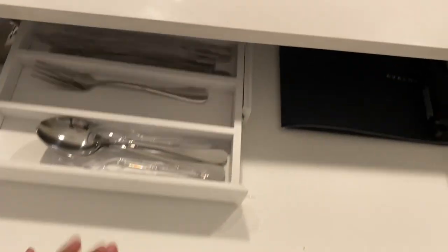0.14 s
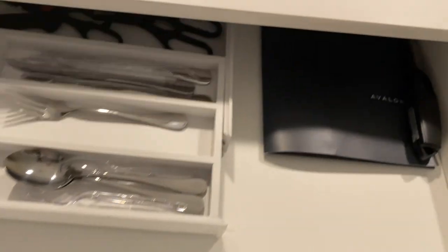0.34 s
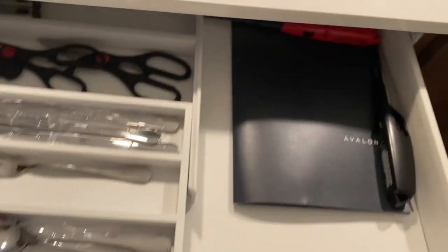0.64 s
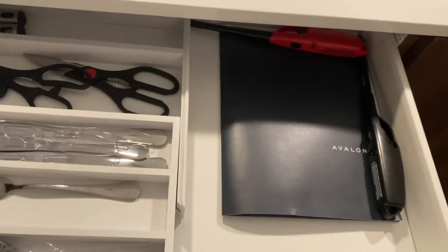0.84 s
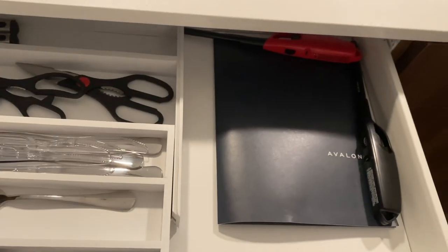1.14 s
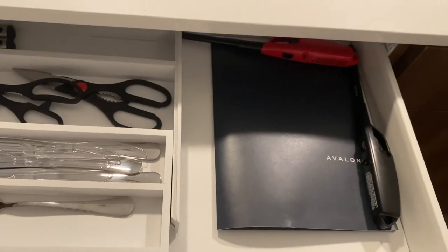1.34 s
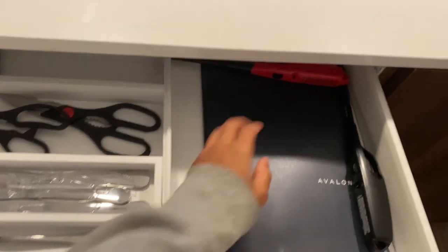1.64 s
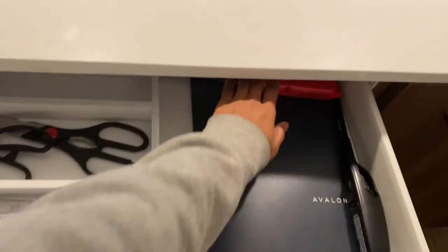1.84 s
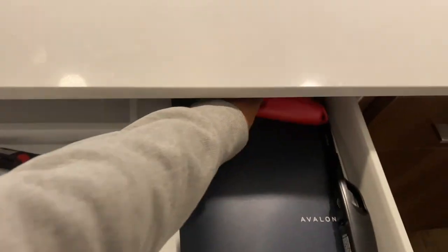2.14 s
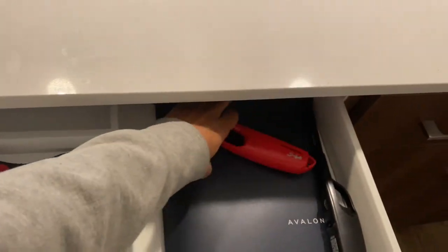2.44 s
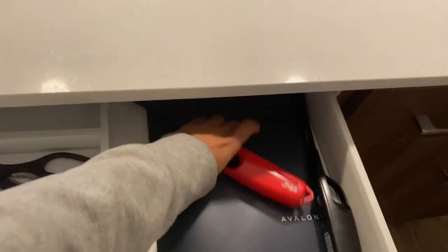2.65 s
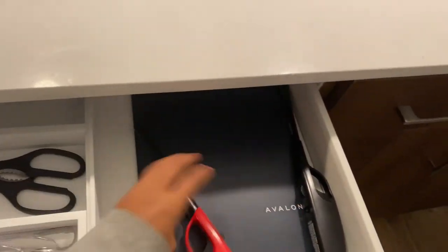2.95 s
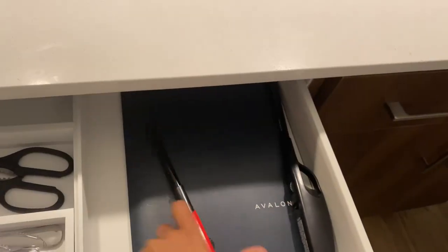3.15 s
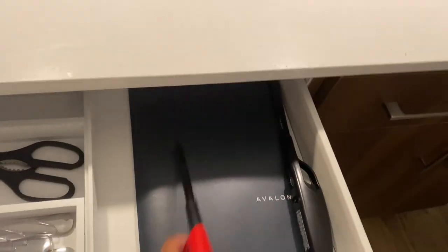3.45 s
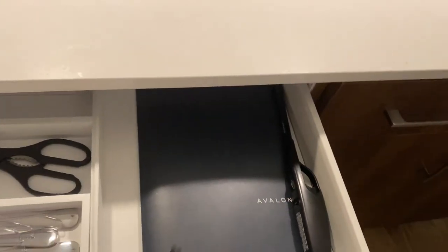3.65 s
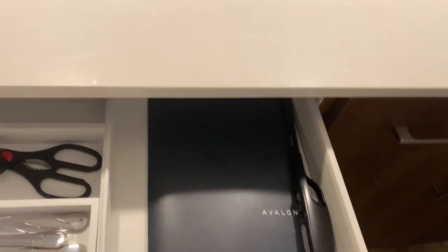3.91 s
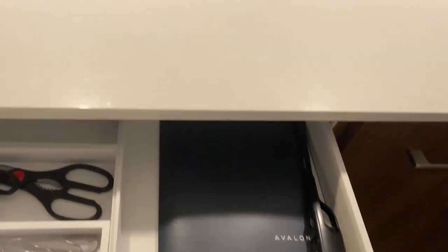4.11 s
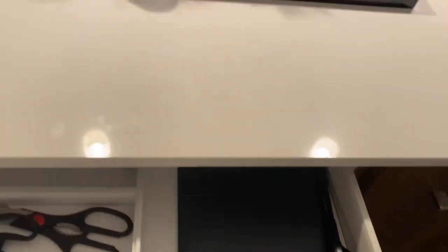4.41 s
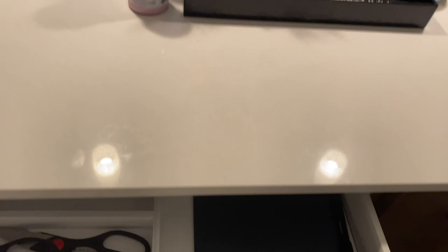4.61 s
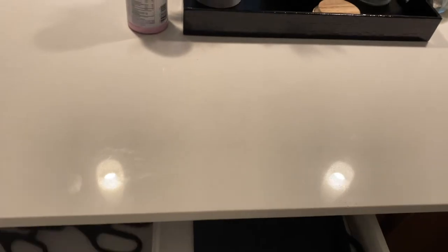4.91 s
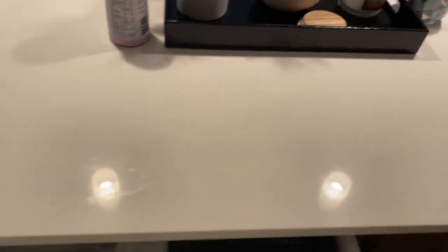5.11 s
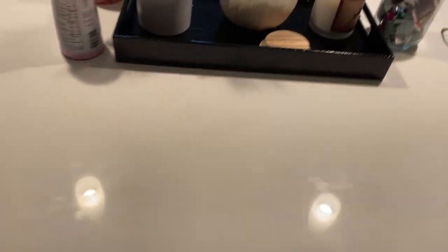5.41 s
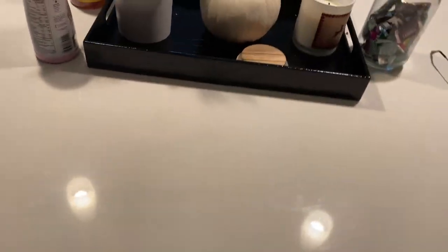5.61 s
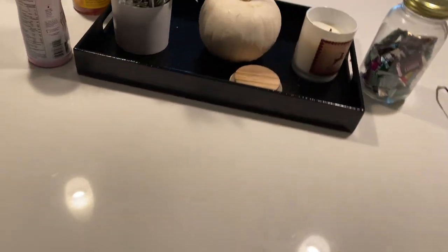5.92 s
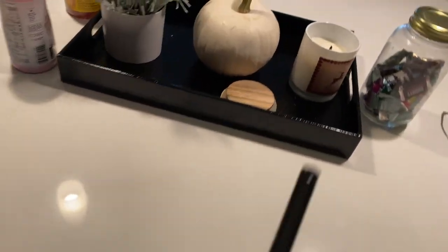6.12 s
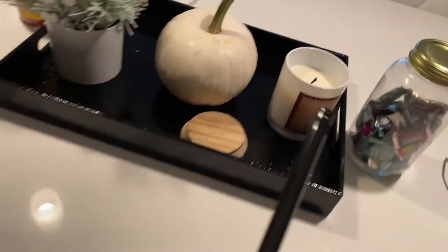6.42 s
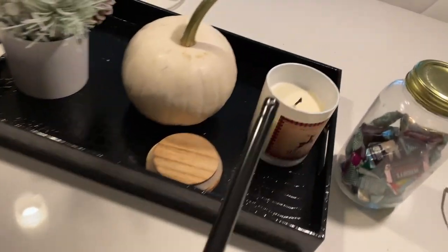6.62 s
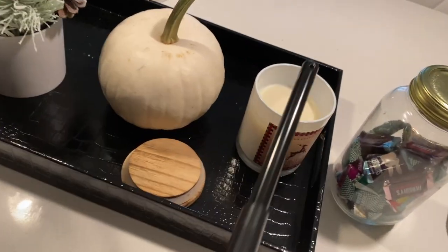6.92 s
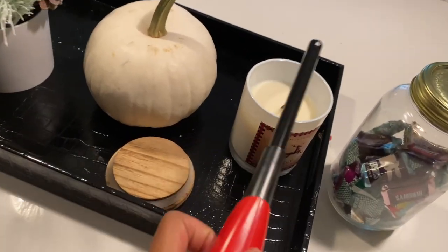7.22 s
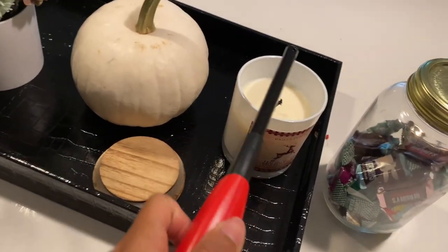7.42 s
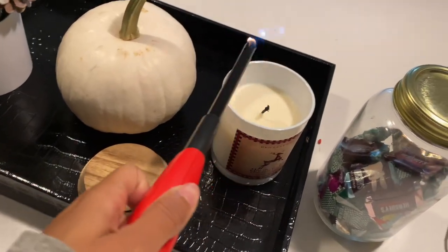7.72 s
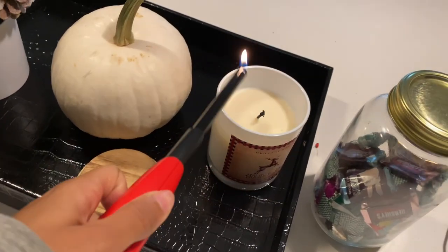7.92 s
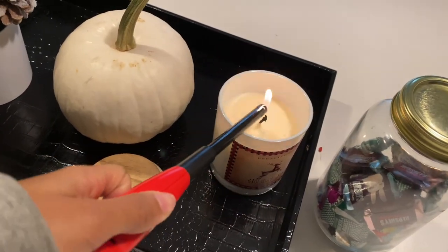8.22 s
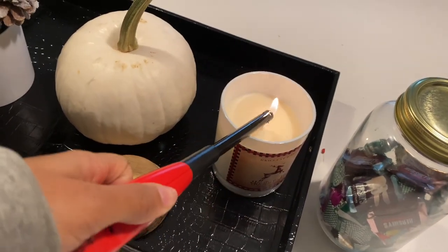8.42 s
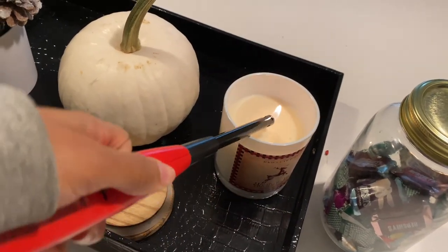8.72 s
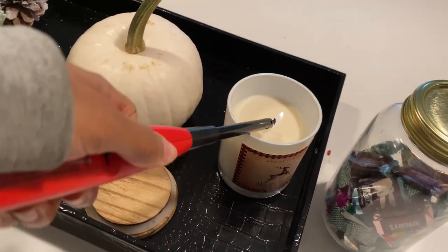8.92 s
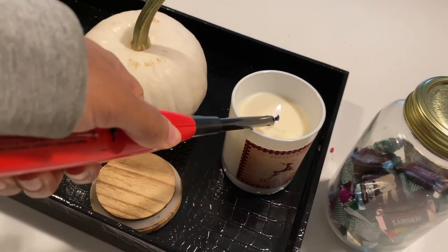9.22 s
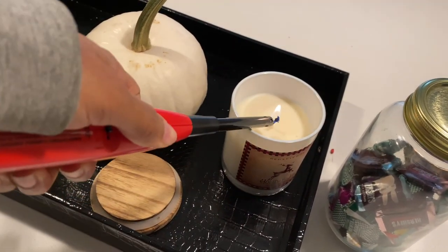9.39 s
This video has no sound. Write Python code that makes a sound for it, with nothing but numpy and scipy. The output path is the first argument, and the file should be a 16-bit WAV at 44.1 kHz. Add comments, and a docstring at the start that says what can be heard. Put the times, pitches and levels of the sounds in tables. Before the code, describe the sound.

Heard from arm's length in a quiet kitchen with hard walls, a drawer rolls open and slams, leaving forks faintly ringing. A hand drags out a plastic lighter with bursts of knocking, sliding and rustling. The drawer rumbles back in, jingling the cutlery, and its steel catch snaps home. After some soft handling clicks, the lighter fires with one sharp snap and a thin, short sizzle of gas.

```python
"""A kitchen drawer and a lighter

A drawer rumbles out on its rollers and slams into its stop, rattling the cutlery. A hand drags a
plastic utility lighter out over a folder, then the drawer rolls shut and its steel catch latches.
The lighter's trigger snaps and ticks over a candle, and gas sizzles from the nozzle.
All is heard from arm's length in a kitchen whose hard walls echo."""
import sys
import numpy as np
from scipy import signal
from scipy.fft import rfft, irfft
from scipy.io import wavfile
from scipy.ndimage import uniform_filter1d

SR = 44100
rng = np.random.default_rng(int(sys.argv[2]) if len(sys.argv) > 2 else 0)


def output_pcm(signal):
    """Save a mono or channel-first signal as 16-bit PCM at the path in sys.argv[1].

    Samples are clipped to [-1, 1] before scaling.
    """
    pcm = np.clip(np.atleast_2d(signal).T, -1, 1) * 32767
    wavfile.write(sys.argv[1], SR, np.round(pcm).astype(np.int16))


N = 421155
TIME = np.arange(N) / SR

# A "colour" says how strong each pitch is. A "ring time" is how long a sound takes to fall by 60 dB.
# Colour of the room's air. Each row: frequency in Hz, level in dB.
AIR_COLOUR = [(15, -50), (25, -12.5), (101, -5.5), (160, -9.5), (523, -27), (3930, -44), (5430, -39),
              (9810, -39), (12200, -41.5), (14300, -38), (15500, -45.5)]
# The kitchen's echo. Each row: frequency in Hz, ring time in seconds.
ECHO_TIMES = [(80, 0.39), (300, 0.5), (1000, 0.58), (2500, 0.61), (6000, 0.54), (14000, 0.27)]
# Resonances of the two microphone openings (ports). Each row: frequency in Hz, gain in dB.
PORT_COLOUR = [(6000, 2), (7400, 2), (8450, -7.5), (9400, 5.5), (11100, 3), (12200, -27.5), (13200, 4),
               (14900, 1)]
# The right port is duller in the middle, brighter on top. Each row: frequency in Hz, dB above the left.
RIGHT_OVER_LEFT = [(80, -0.5), (250, -1.3), (520, -3), (1200, -1.1), (4000, -4), (9000, 1), (14000, 2)]

# Lighter and hand sliding over folder and drawer.
# Each row: time of the peak in seconds, level in dB, swell in seconds, fade in seconds.
STROKES = [(2.075, -39, 0.016, 0.025), (2.29, -43, 0.032, 0.036), (2.555, -32, 0.03, 0.0078),
           (2.665, -34.5, 0.04, 0.03), (2.735, -34, 0.14, 0.084), (2.86, -45, 0.048, 0.018),
           (3.188, -29, 0.033, 0.0083), (3.335, -44.5, 0.042, 0.01), (3.44, -56.5, 0.062, 0.054),
           (3.72, -57.5, 0.3, 0.26), (4.19, -43.5, 0.068, 0.036), (4.39, -48, 0.074, 0.036),
           (6.55, -60, 0.088, 0.096)]
# Sleeve and grip rustling. Each row: time of the peak in seconds, level in dB, length in seconds.
RUSTLES = [(1.612, -46, 0.18), (1.782, -48.5, 0.099), (2.113, -40.5, 0.25), (3.185, -31, 0.05),
           (3.573, -55.5, 0.43), (4.139, -40, 0.025), (4.21, -44, 0.16), (6.218, -54.5, 0.24),
           (6.874, -42.5, 0.11), (7.138, -52.5, .1), (7.431, -49.5, 0.043), (7.585, -52, 0.083)]
# Colours of the sliding and the rustling. Each row: frequency in Hz, level in dB.
STROKE_COLOUR = [(100, -12.5), (500, -9.5), (1500, -0.5), (3500, -3.5), (5500, -6.5), (8000, -4),
                 (11000, -6.5), (14500, -6.5)]
RUSTLE_COLOUR = [(50, -6), (150, 3), (300, -1), (700, -7), (1700, -14.5), (3500, -30), (9000, -34.5),
                 (15000, -45)]

# The tones (modes) a struck thing rings with. Each row: frequency in Hz, level in dB, ring time in seconds.
FLOOR_MODES = [(75.2, -18.5, 0.89), (178.5, -14.5, .18), (228.7, -14.5, 0.27), (462, -10.5, 0.15),
               (544, -7, 0.1), (609, 2.5, 0.092), (953, 0.5, 0.05), (1487, -5, 0.036)]  # drawer floor under the folder
SPOON_MODES = [(2700, -4, .06), (4400, -7, .04), (6750, 0, .06)]  # one loose spoon
FORK_MODES = [(1039, -44, 2.0), (1308, -39, .7), (2094, -42, 1.0), (2293, -35, 1.55), (2385, -44, 1.6)]  # forks and spoons that keep ringing
SHELL_MODES = [(1345, -9.5, 0.022), (1560, -0.5, 0.037), (1907, 0.5, 0.0316), (2350, 1, 0.055),
               (2600, -2, .03), (3335, -6, 0.027), (3630, -2, 0.025), (3910, -3.5, 0.04), (4124, -7, 0.047),
               (6800, -11, 0.0459), (11530, -11.5, 0.025), (14830, -6, 0.0249)]  # the lighter's plastic shell
CATCH_MODES = [(1548, -8, 0.15), (1598, -6, 0.11), (1896, 1.5, 0.11), (2040, -12, .12), (2090, -0.5, 0.12),
               (2256, -6.5, 0.12), (2326, -4.5, 0.12), (2465, -7, 0.13), (2820, -14.5, 0.084),
               (3582, -14.5, 0.13), (6540, -3, 0.071)]  # steel catch of the runners
PANEL_MODES = [(68, -11, 0.76), (128.6, 6, 0.17), (185.8, -10.5, 0.24), (239, -1, 0.24),
               (311.5, -2.5, 0.28), (390, -8, .18), (463, -8, 0.11), (566, 2, 0.089), (764, -3.5, 0.13)]  # the drawer's panels

# Hard hits. Each row: start in seconds, level in dB, pitch of the knock in Hz, chatter in milliseconds,
# then the crack and the ring, both in dB compared with the knock.
FOLDER_HITS = [(1.994, -33, 1200, 6.9, -1, -7), (2.0445, -9, 1200, 4.6, -13, -13),
               (2.058, -8.5, 1090, 3.8, -4.5, -11.5), (2.0945, -12.5, 1210, 1.4, -0.5, -8),
               (2.1195, -7.5, 1140, 3.1, -8, -1), (2.2534, -12.5, 1260, 0.82, -4, -14),
               (2.2838, -9.5, 1520, 3.7, -12.5, -11), (2.3315, 1.5, 900, 4.18, -14.5, -8),
               (2.452, -21, 1270, 1.2, -6, -18), (2.493, -10.5, 1070, 2.9, -8.5, -11.5),
               (2.641, -18.5, 1470, 1.2, -19, -42), (2.8206, -19, 1140, 2.5, -9, -19),
               (3.082, -19.5, 1080, 0.72, -8, -12), (3.102, -24, 1200, 1.2, -22, -19),
               (3.1364, -14.5, 1800, 5.8, -15, -7), (3.2778, -20, 1490, 3.5, -10, -18)]  # lighter on the folder
LIGHTER_HITS = [(3.8925, -23, 3560, 1.5, 4, -16), (6.1435, -32.5, 3040, 1.8, -3.5, -19),
                (6.176, -32, 4000, 1.77, -15, -12), (6.327, -44.5, 3060, 2.2, -9, -20),
                (6.469, -42.5, 1200, 3.4, 2, -26.5), (6.84, -37.5, 1580, 6.4, -9, -10),
                (7.1932, -26, 1290, 1.8, -7, -17), (7.201, -27.5, 798, 2.7, -11, -18.5),
                (7.6203, -10, 2600, 1.9, 16.5, -12.5), (8.002, -17, 2500, 2.0, -5, 2.5),
                (8.3225, -28.5, 2017, 2.4, -28, -6)]  # lighter clicking in the hand
LATCH_HITS = [(4.576, -27, 1500, 5, -9, -27), (4.6325, -28, 5000, 1.4, 8, -20),
              (4.687, -18.5, 5300, 6.1, -2.5, -10), (4.935, -27.5, 4030, 3.8, 6.5, -19),
              (5.6507, -19.5, 3050, 4, -3, -14.5), (5.677, -18, 1700, 26, -0.5, -15),
              (5.7075, -2.5, 1980, 5.34, 1.5, -4), (5.7245, 3.5, 2080, 4, -2.5, -18.5)]  # latch engaging and snapping home
DRAWER_HITS = [(.004, -13, 407, 16.4, -8, -10), (.032, -14, 302, 5.1, -11, -2.5),
               (.629, -13, 710, 9.6, -3.5, -14), (.637, -5, 613, 3.2, -4, -4), (.645, 4, 265, 5.2, -4, -7),
               (.654, 6.5, 720, 15, -4.5, -20.5), (.893, -15.5, 604, 20, -25.5, -25),
               (.951, -10.5, 630, 13.6, -33, -22), (4.106, -32.5, 690, 14.4, -13.5, -20),
               (4.386, -24.5, 1530, 13.5, -29, -0.5), (4.706, -16, 670, 2.6, -22, -7),
               (5.272, -15, 238, 5.3, -25, -6), (5.945, -24.5, 900, 7.3, -31, -18),
               (6.098, -30.5, 840, 9.2, -32.5, -13)]  # blows on the drawer

# Taps of the loose spoon. Each row: start in seconds, level in dB.
SPOON_TAPS = [(0.122, -27), (0.1785, -37.5), (0.201, -26.5), (.236, -35), (.281, -38.5), (0.292, -37.5),
              (0.368, -34), (0.422, -40), (.438, -34.5), (0.509, -39.5), (0.53, -41.5), (4.764, -29.5),
              (4.814, -29.5), (4.899, -35), (4.976, -28), (5.1238, -26.5), (5.557, -28.5)]
# Jolts to the cutlery. Each row: start in seconds, level in dB, swell in seconds, settling in seconds.
JOLTS = [(.030, -20.5, 0.013, 0.026), (.122, -33.5, 0.008, 0.0092), (0.651, -6.5, 0.042, 0.023),
         (0.781, -31, .011, 0.1), (4.805, -35, 0.011, 0.015), (5.12, -29.5, 0.052, 0.079),
         (5.195, -21, 0.015, .04), (5.289, -25.5, 0.016, 0.034), (5.37, -33.5, 0.012, 0.069),
         (5.551, -32, 0.012, 0.044)]
# Colour of cutlery in its tray. Each row: frequency in Hz, level in dB.
RATTLE_COLOUR = [(300, -16), (700, -3), (1200, 0), (2100, 2), (3200, -3), (5000, -2), (8000, -6.5),
                 (11000, -4), (14500, -3)]

# Spurts of gas. Each row: time of the peak in seconds, level in dB, swell in seconds, fade in seconds.
GAS_SPURTS = [(7.66, -37.5, 0.019, 0.055), (7.87, -55.5, .06, .05), (8.19, -59.5, 0.0077, 0.031)]
# Colour of the gas. Each row: frequency in Hz, level in dB.
GAS_COLOUR = [(1000, -25), (4000, -15), (9500, 3.5), (14500, -8.5)]
# Tones of the spring behind the lighter's hammer. Each entry: frequency in Hz.
SPRING_HZ = [2650, 6520, 9320, 14900]

# Colour of the rollers on their rails. Each row: frequency in Hz, level in dB.
ROLL_COLOUR = [(21, -41.5), (35, -17.5), (80, 0), (112, 1), (158, -4), (240, -1), (318, -6.5), (357, -1),
               (440, -12), (733, -9), (843, -14.5), (1540, -25), (2500, -28), (4000, -43.5), (9000, -53),
               (19800, -120)]
# Loudness of the rolling, out and back in. Each row: time in seconds, level in dB.
ROLL_OUT = [(0, -23), (.16, -30.5), (.27, -29), (.62, -34)]
ROLL_IN = [(4.64, -48.5), (4.78, -29.5), (5.05, -31.5), (5.28, -21), (5.38, -34.5), (5.8, -33.5),
           (6.2, -58.5)]
# Roller bumps on the way in. Each row: start in seconds, level in dB, pitch in Hz.
ROLLER_BUMPS = [(4.773, -23, 400), (4.856, -21, 350), (4.931, -22, 450), (4.99, -21, 420),
                (5.059, -23, 350), (5.084, -26, 400), (5.207, -14.5, 600), (5.3, -17, 500),
                (5.476, -21, 300), (5.556, -42.5, 350), (5.599, -27.5, 250)]
# Hollow knocks as the push begins.
# Each row: start in seconds, level in dB, pitch it sinks towards in Hz, swell in milliseconds.
PUSH_CLUNKS = [(4.58, -21.5, 436, 8.2), (4.638, -20, 387, 5.6)]
# Soft, low booms. Each row: start in seconds, level in dB, pitch in Hz, fade of the push in milliseconds.
THUDS = [(0.649, -11, 135.9, 12), (1.98, -39, 125, 11), (2.118, -44.5, 69.5, 76), (2.269, -28, 68, 145),
         (2.821, -23, 328, 4), (3.083, -26.5, 320, 5.9), (3.139, -22.5, 168.7, 12.7),
         (3.419, -40, 78.2, 57), (4.312, -33, 64, 57), (4.392, -32.5, 64.02, 290), (5.70, -20.5, 110.3, 70),
         (7.55, -34, 90, 14), (7.622, -26.5, 151.1, 36), (7.656, -23, 85.5, 8.9), (8.011, -39.5, 191, 13.6)]

SLAM_S = .66  # the drawer has just hit its stop


def amp(db):
    """Turn decibels into a number to multiply by."""
    return 10 ** (np.asarray(db) / 20)


def unit_rms(x):
    """Scale a sound so its average strength (rms) is 1."""
    return x / np.sqrt(np.mean(x ** 2))


def unit_peak(x):
    """Scale a sound so its peak is 1."""
    return x / np.abs(x).max()


def add(track, s, sound):
    """Mix a sound into a track, starting at s seconds."""
    start = max(int(s * SR), 0)
    track[:, start:start + sound.shape[-1]] += sound[..., :N - start]


def lookup(points, hz):
    """Read between the rows of a (Hz, value) table, spacing octaves evenly."""
    f, value = np.transpose(points)
    return np.interp(np.log(hz + 1), np.log(f), value)


def keep_band(x, hz, kind, order=1):
    """Let the "low" part, the "high" part or a "band" of a sound through."""
    return signal.lfilter(*signal.butter(order, hz, kind, fs=SR), x)


def resonate(x, hz, sharpness):
    """Bring out one pitch in a sound."""
    return signal.lfilter(*signal.iirpeak(hz, sharpness, fs=SR), x)


def colour(x, points, size=4096):
    """Filter a sound with a colour table."""
    gains = amp(lookup(points, np.arange(size // 2 + 1) * SR / size))
    cepstrum = irfft(np.log(gains))
    # Folding this in half keeps the filter from sounding before its input.
    cepstrum[1:size // 2] *= 2
    cepstrum[size // 2 + 1:] = 0
    response = irfft(np.exp(rfft(cepstrum)))
    return signal.oaconvolve(x, response[None])[:, :x.shape[1]]


def envelope(curve):
    """Smooth loudness through (seconds, dB) rows, silent outside them."""
    s, db = np.transpose(curve)
    active = (TIME >= s[0]) & (TIME <= s[-1])
    return uniform_filter1d(amp(np.interp(TIME, s, db)) * active, size=600)


def swells(rows):
    """Loudness of movements that each grow to a peak and die away."""
    power = sum(amp(2 * db) * np.exp(-2 * np.maximum((s - TIME) / swell, (TIME - s) / fade))
                for s, db, swell, fade in rows)
    return np.sqrt(power)


def damped_swell(t, swell_ms):
    """Loudness of a vibration that builds briefly and is then choked."""
    age = t * 1000 / swell_ms
    return age * np.exp((1 - age ** 3) / 3)


def wander(rate):
    """A random curve that heads for a new value rate times a second."""
    knots = rng.standard_normal(2000)
    return np.interp(TIME * rate, np.arange(len(knots)), knots)


def wavering(hz, rate):
    """A tone whose strength and phase wander."""
    phase = 2 * np.pi * np.cumsum(hz) / SR
    return unit_rms(wander(rate) * np.sin(phase) + wander(rate) * np.cos(phase))


def stereo_noise(n, apart_hz):
    """Left and right noise: alike in the bass, unrelated above apart_hz."""
    mid, side = rng.standard_normal((2, n))
    side = keep_band(side, apart_hz, "high")
    return unit_rms(np.array([mid + side, mid - side]))


def grains(rate, spread_db):
    """Tiny random contacts, about rate a second, a few stronger than the rest."""
    happens = rng.random(N) < rate / SR
    size = np.minimum(rng.exponential(size=N), 4)
    return happens * amp(spread_db * size)


def crackle(rate, spread_db, length_s):
    """Each tiny contact gives a short burst of noise."""
    decay = np.exp(-1 / (length_s * SR))
    power = signal.lfilter([1], [1, -decay], grains(rate, spread_db) ** 2)
    return unit_rms(np.sqrt(power) * stereo_noise(N, 1300))


def ring(modes, seconds, vary_db=1.5):
    """Fading tones of a struck thing, mixed by chance as if each blow lands somewhere new."""
    t = np.arange(int(seconds * SR)) / SR
    out = np.zeros(len(t))
    for hz, db, ring_s in modes:
        share, side = rng.standard_normal(2)
        gain = np.sign(side) * amp(db + vary_db * share)
        out += gain * np.sin(2 * np.pi * hz * t) * np.exp(-np.log(1000) * t / ring_s)
    return out


def hits(table, modes, sharpness, crack_hz, rise_ms=1):
    """Each hit chatters briefly: a dull knock, a bright crack, then the ring of the struck thing."""
    out, t = np.zeros((2, N)), TIME[:SR // 8]
    for s, db, hz, chatter_ms, crack_db, ring_db in table:
        force = (1 - np.exp(-t * 1000 / rise_ms)) * np.exp(-t * 1000 / chatter_ms)
        knock = resonate(stereo_noise(len(t), 1300) * force, hz, sharpness)
        knock = keep_band(knock, 2 * hz, "low")
        crack = keep_band(stereo_noise(len(t), 5600) * force, crack_hz, "high")
        add(out, s, amp(db) * (unit_peak(knock) + amp(crack_db) * unit_peak(crack)))
        add(out, s + chatter_ms / 2000, amp(db + ring_db) * unit_peak(ring(modes, .5)))
    return out


def room_air(level_db=-60.5):
    """The room's air is a quiet, steady rumble with a faint hiss."""
    return amp(level_db) * unit_rms(colour(stereo_noise(N, 500), AIR_COLOUR))


def kitchen_echo():
    """Sound bounces off the worktop and walls; the highest pitches die first."""
    t, hz = TIME[:SR], np.arange(SR // 2 + 1)
    spectrum = rfft(stereo_noise(SR, 600))
    echo = 0
    for centre_hz, ring_s in ECHO_TIMES:
        band = lookup([(f, f == centre_hz) for f, _ in ECHO_TIMES], hz)
        echo = echo + irfft(spectrum * band) * np.exp(-np.log(1000) * t / ring_s)
    arrival = np.clip(t / 0.004 - 1, 0, 1)
    early_boost = 1 + 0.56 * np.exp(-t / 0.019)
    return unit_rms(echo * arrival * early_boost) / np.sqrt(SR)


def handling(drag_db=-3, grip_db=-1, rasp_hz=4200, rasp_db=-8, swell_share=.45):
    """Plastic, skin and sleeve catch and slip in tiny steps; the folder rasps under each stroke."""
    slips = crackle(2600, 3.0, .0004) * amp(1.5 * wander(45))
    rasp = unit_rms(resonate(slips, rasp_hz, 2.5))
    drag = (unit_rms(colour(slips, STROKE_COLOUR)) + amp(rasp_db) * rasp) * swells(STROKES)
    rustles = swells([(s, db, swell_share * length, (1 - swell_share) * length)
                      for s, db, length in RUSTLES])
    grip = unit_rms(colour(crackle(2000, 3.6, 0.0026), RUSTLE_COLOUR)) * rustles
    return amp(drag_db) * drag + amp(grip_db) * grip


def folder_knocks():
    """The lighter knocks on the folder, and the drawer floor rings beneath it."""
    return hits(FOLDER_HITS, FLOOR_MODES, sharpness=1.1, crack_hz=1200)


def singing_forks():
    """A few loose pieces of cutlery ring on long after the slam."""
    out = np.zeros((2, N))
    add(out, SLAM_S, ring(FORK_MODES, 2, vary_db=0.5))
    return out


def spoon_clinks(contact_hz=2500, chatter_ms=4.5, crack_db=0, ring_db=-10):
    """A loose spoon hops in the tray with light, bright taps."""
    taps = [(s, db, contact_hz, chatter_ms, crack_db, ring_db) for s, db in SPOON_TAPS]
    return hits(taps, SPOON_MODES, sharpness=1.2, crack_hz=4000)


def cutlery_rattle(tines_db=-8, ring_s=0.015, tone_count=90):
    """Jolts shake knives and forks in their plastic tray; each contact rings the steel briefly."""
    shake, t = np.zeros((1, N)), TIME[:SR]
    for s, db, swell, settle in JOLTS:
        rise = np.sqrt(np.minimum(t / swell, 1))
        fall = np.exp(-np.maximum(t - 1.4 * swell, 0) / settle)
        add(shake, s, amp(db) * rise * fall)
    contacts = unit_rms(colour(crackle(1100, 1.2, 0.0031), RATTLE_COLOUR))
    steel = ring([(hz, 0, ring_s) for hz in rng.uniform(2000, 15000, tone_count)], .3)
    tines = unit_rms(signal.oaconvolve(contacts, steel[None])[:, :N])
    return (contacts + amp(tines_db) * tines) * shake


def gas():
    """Gas sizzles thinly from the nozzle after the snap, and again as the flame meets the wick."""
    return unit_rms(colour(crackle(4000, 1.5, .0005), GAS_COLOUR)) * swells(GAS_SPURTS)


def lighter_clicks():
    """The lighter clicks in the hand, and its plastic shell rings briefly."""
    return hits(LIGHTER_HITS, SHELL_MODES, sharpness=1.8, crack_hz=2440)


def trigger_snap(start_s=7.6208, level_db=-0.5, body_hz=1290, rasp_db=-9, spring_db=-12):
    """The lighter's spring hammer fires: the body rasps, the spring zings, the hand damps them."""
    out, t = np.zeros((2, N)), TIME[:SR // 20]
    rasp = unit_rms(keep_band(stereo_noise(len(t), 2280), [1000, 4500], "band"))
    body = damped_swell(t, swell_ms=2.2) * (np.sin(2 * np.pi * body_hz * t) + amp(rasp_db) * rasp)
    spring = damped_swell(t, swell_ms=0.97) * sum(np.sin(2 * np.pi * hz * t) for hz in SPRING_HZ)
    add(out, start_s, amp(level_db) * (body + amp(spring_db) * spring))
    return out


def whirr_pitch(pull_hz=376, rise_hz_per_s=165, push_hz=441.5, brake_hz_per_s=300, creep_hz=227.5):
    """The rollers' pitch follows their speed: up with the pull, down as a damper brakes the drawer."""
    pulled = pull_hz + rise_hz_per_s * TIME
    coasting_s = np.maximum(TIME - 4.7, 0)
    pushed = np.maximum(push_hz - brake_hz_per_s * coasting_s, creep_hz)
    return np.where(TIME < SLAM_S, pulled, pushed)


def rollers(panel_db=-5, whirr_db=-7, overtone_db=-16, uneven_db=1.5, gain_db=-2.0):
    """Rollers rumble and whirr along the rails, shaking the drawer's panels."""
    rails = unit_rms(colour(crackle(380, 2.3, 0.0013), ROLL_COLOUR))
    kicks = grains(300, 2.7) * rng.standard_normal(N)
    panels = unit_rms(signal.oaconvolve(kicks, ring(PANEL_MODES, .5))[:N])
    hz = whirr_pitch()
    whirr = amp(whirr_db) * wavering(hz, 35) + amp(overtone_db) * wavering(2 * hz, 60)
    rolling = rails + amp(panel_db) * panels + whirr
    return rolling * amp(gain_db + uneven_db * wander(22)) * (envelope(ROLL_OUT) + envelope(ROLL_IN))


def roller_bumps(chatter_ms=6, crack_db=-24, ring_db=-7):
    """A roller jumps a rough spot on its rail and taps the drawer."""
    bumps = [(s, db, hz, chatter_ms, crack_db, ring_db) for s, db, hz in ROLLER_BUMPS]
    return hits(bumps, PANEL_MODES, sharpness=1.6, crack_hz=900)


def push_clunks(rough=0.51, upper_db=2, sag=0.14):
    """The soft-close mechanism in the runners knocks when pushed; the pitch sags as the contact slackens."""
    out, t = np.zeros((2, N)), TIME[:SR // 20]
    for s, db, hz, swell_ms in PUSH_CLUNKS:
        pitch = hz * (1 + sag * np.exp(-t * 1000 / swell_ms))
        phase = 2 * np.pi * np.cumsum(pitch) / SR
        hollow = np.sin(phase) + amp(upper_db) * np.sin(1.8 * phase)
        grit = unit_rms(keep_band(stereo_noise(len(t), 1200), [hz / 2, 3 * hz], "band", order=2))
        add(out, s, amp(db) * damped_swell(t, swell_ms) * (hollow + rough * grit))
    return out


def thuds():
    """Each soft push makes a low boom that swells and dies away."""
    out, t = np.zeros((2, N)), TIME[:SR]
    for s, db, hz, push_ms in THUDS:
        push = stereo_noise(SR, 600) * np.exp(-t * 1000 / push_ms)
        boom = keep_band(push, [0.46 * hz, 2.1 * hz], "band", order=2)
        add(out, s, amp(db) * unit_peak(boom))
    return out


def latch_snaps():
    """The latch engages and snaps home, ringing its steel catch."""
    return hits(LATCH_HITS, CATCH_MODES, sharpness=7.3, crack_hz=2500)


def drawer_knocks():
    """Blows ring the drawer's panels, hardest when it slams into its stop."""
    return hits(DRAWER_HITS, PANEL_MODES, sharpness=0.88, crack_hz=900)


def place(x, echo, echo_db, left_db, lag_samples=1):
    """A sound on the left reaches the left port louder and sooner; the room adds its echo."""
    left = x[0] * amp(left_db / 2)
    right = np.pad(x[1], (lag_samples, 0))[:N] * amp(-left_db / 2)
    return np.array([left, right]) + amp(echo_db) * signal.oaconvolve(x, echo, axes=1)[:, :N]


def scene():
    """Mix drawer, cutlery, hand and lighter in the kitchen, over quiet room air."""
    echo = kitchen_echo()
    drawer = rollers() + roller_bumps() + drawer_knocks() + thuds()
    rummage = folder_knocks() + handling() + push_clunks()
    latch = latch_snaps()
    lighter = lighter_clicks() + trigger_snap() + gas()
    cutlery = cutlery_rattle() + spoon_clinks() + singing_forks()
    return (room_air()
            + place(rummage, echo, echo_db=-7.5, left_db=1.0)
            + place(cutlery, echo, echo_db=-8.5, left_db=2.0)
            + place(lighter, echo, echo_db=-12.5, left_db=4, lag_samples=8)
            + place(latch, echo, echo_db=-5.0, left_db=4)
            + place(drawer, echo, echo_db=-3.0, left_db=0))


def record(dry):
    """Each port colours the sound its own way; the loudest peaks overload, and the top is cut."""
    x = colour(dry, PORT_COLOUR)
    x = np.vstack([colour(port[None], [(hz, side * db / 2) for hz, db in RIGHT_OVER_LEFT])
                   for port, side in zip(x, (-1, 1))])
    x = x / (1 + x ** 4) ** (1 / 4)  # round off the peaks
    top_cut = signal.ellip(8, .2, 60, 15600, fs=SR, output="sos")  # above 15600 Hz
    return signal.sosfilt(top_cut, x)


dry = scene()
out = record(dry)
output_pcm(out)
```